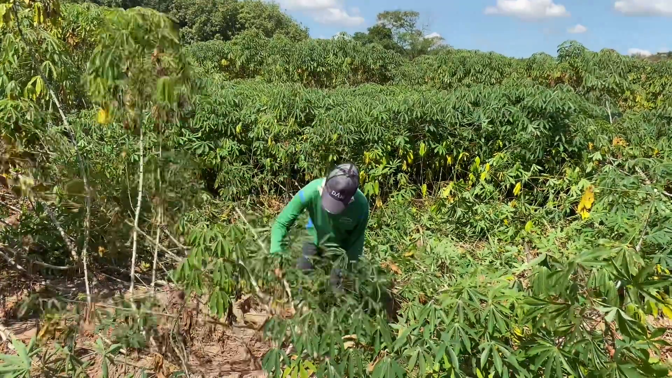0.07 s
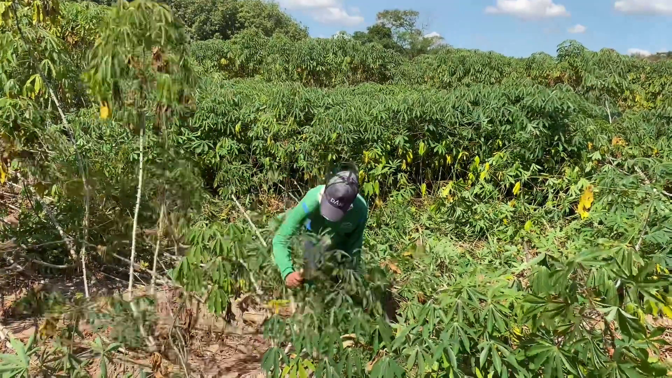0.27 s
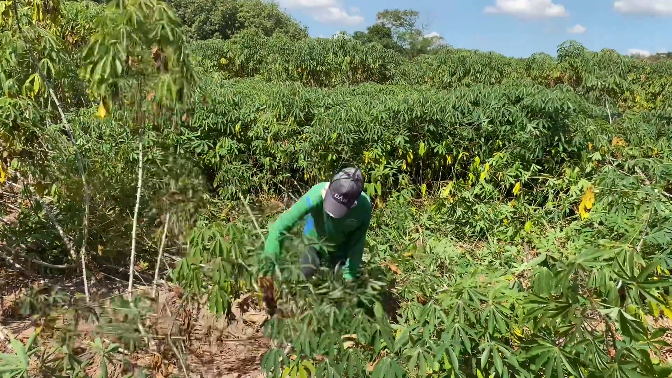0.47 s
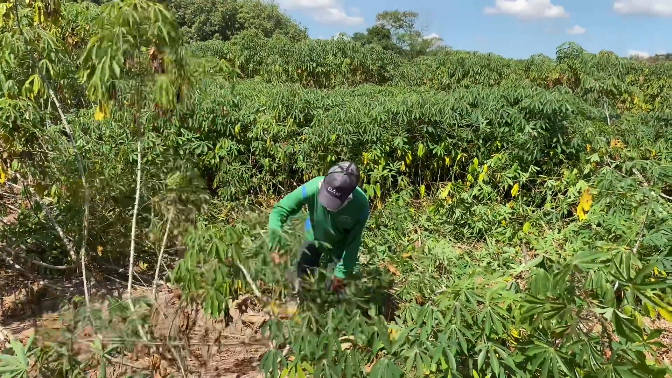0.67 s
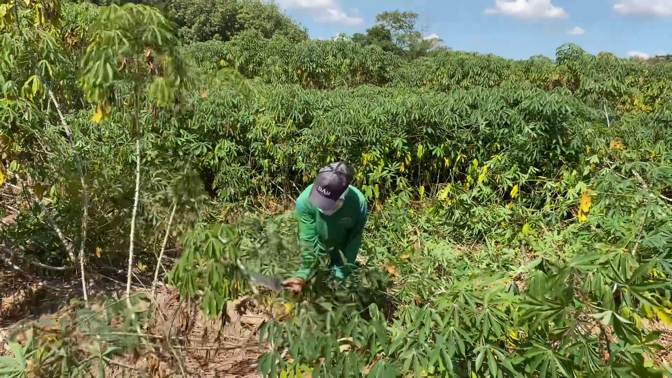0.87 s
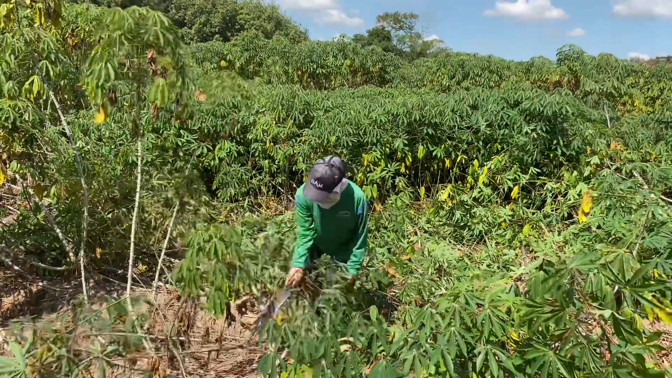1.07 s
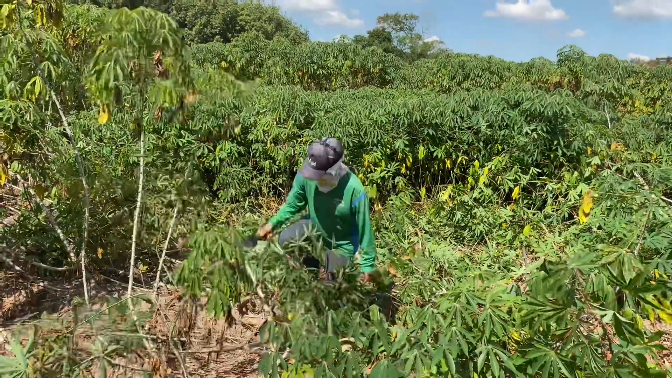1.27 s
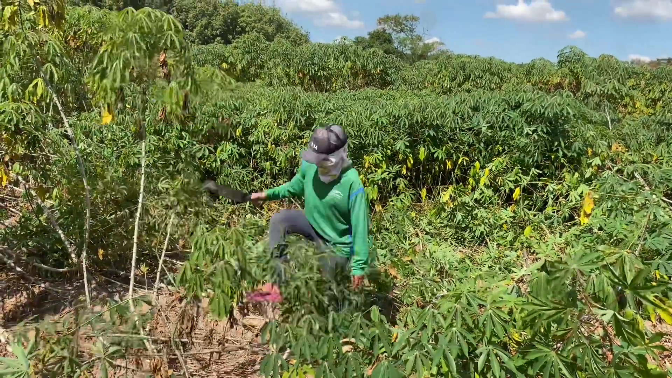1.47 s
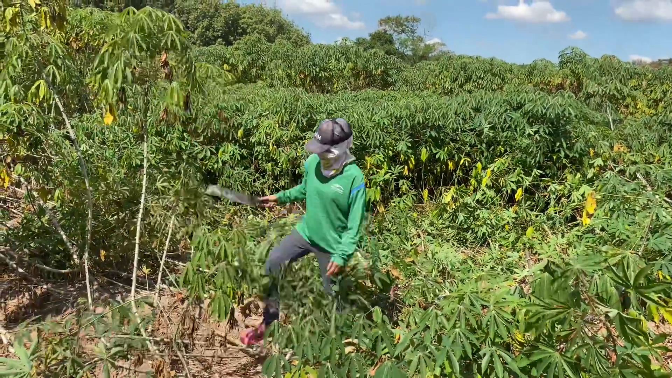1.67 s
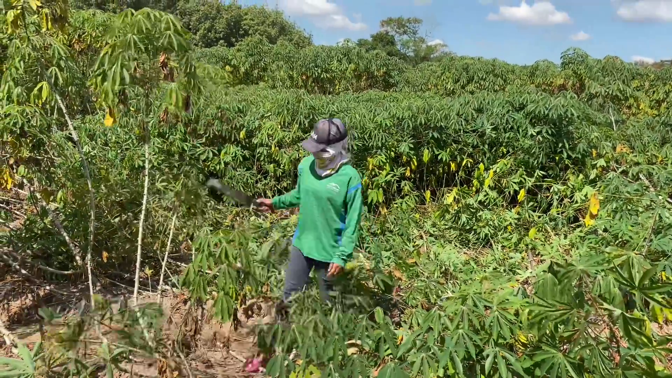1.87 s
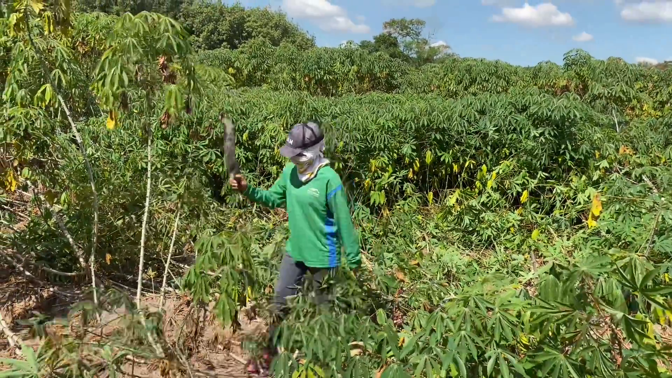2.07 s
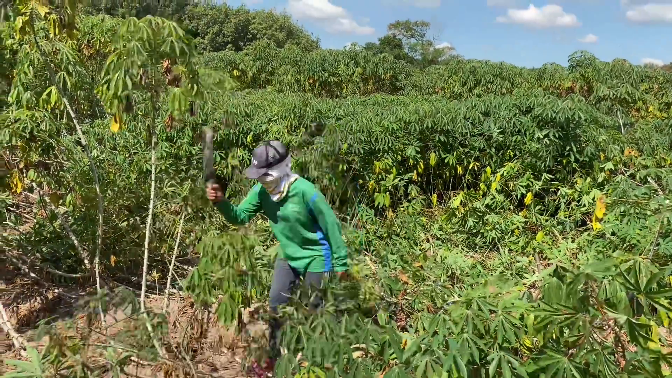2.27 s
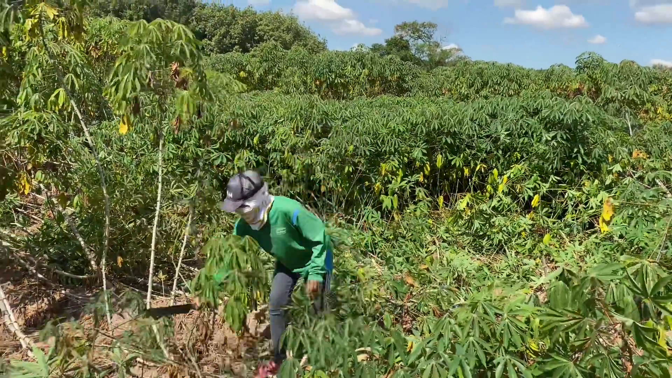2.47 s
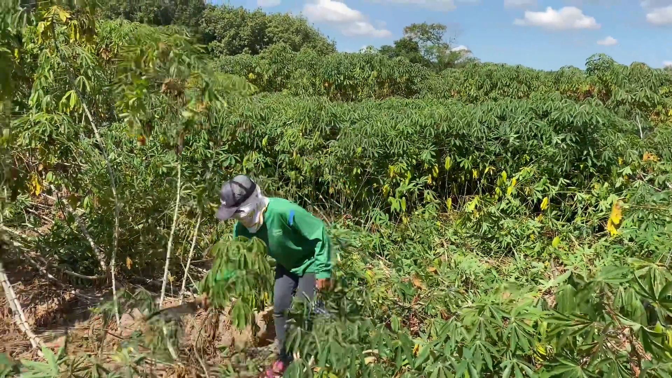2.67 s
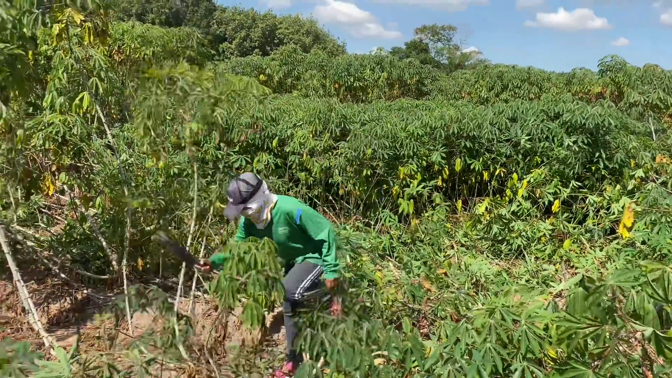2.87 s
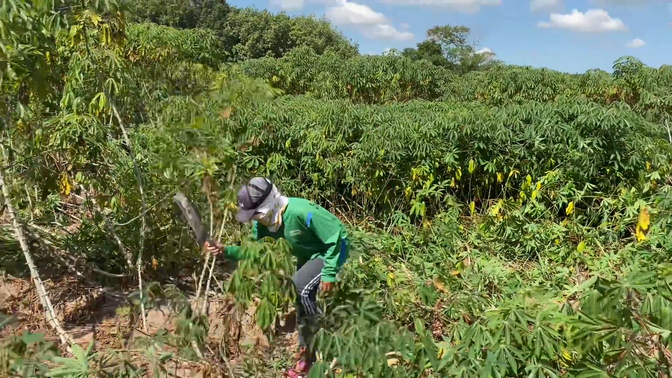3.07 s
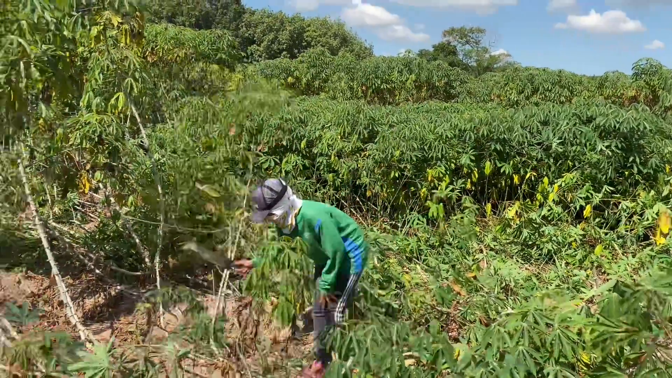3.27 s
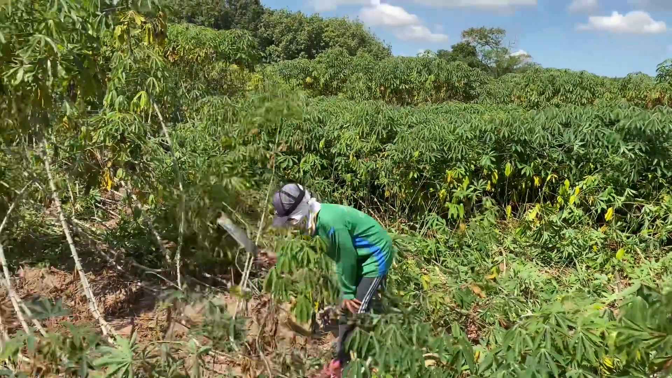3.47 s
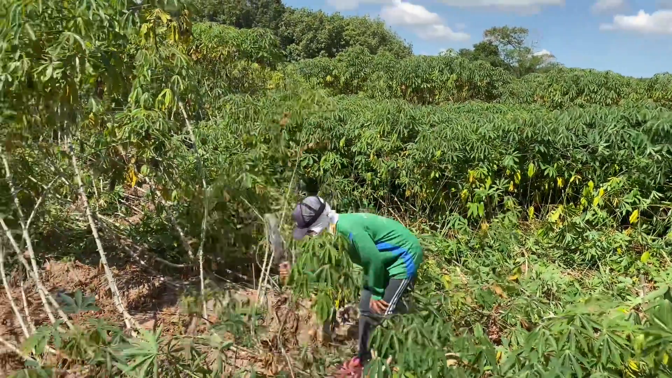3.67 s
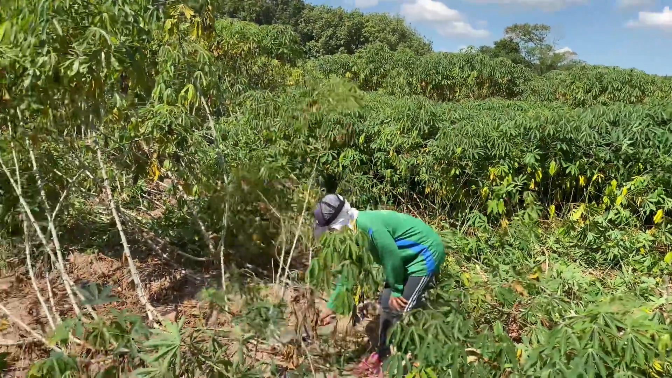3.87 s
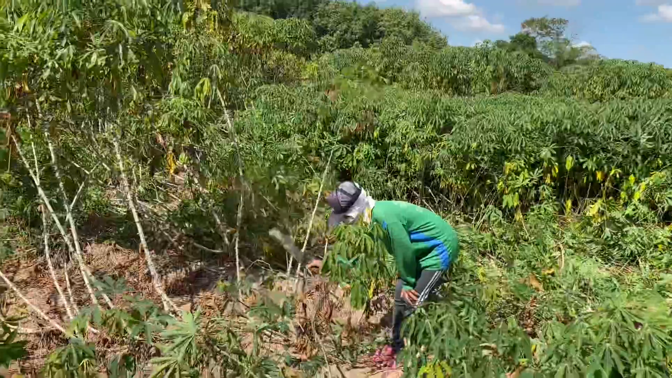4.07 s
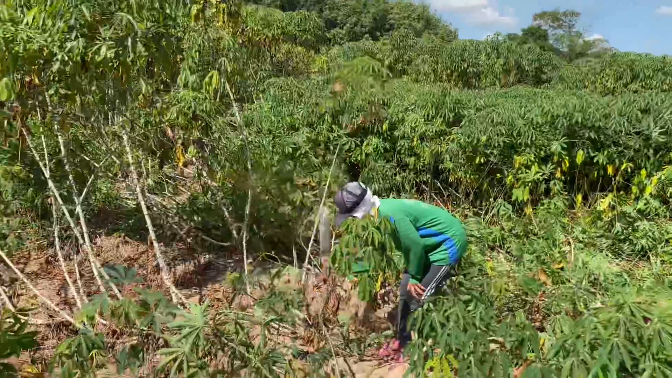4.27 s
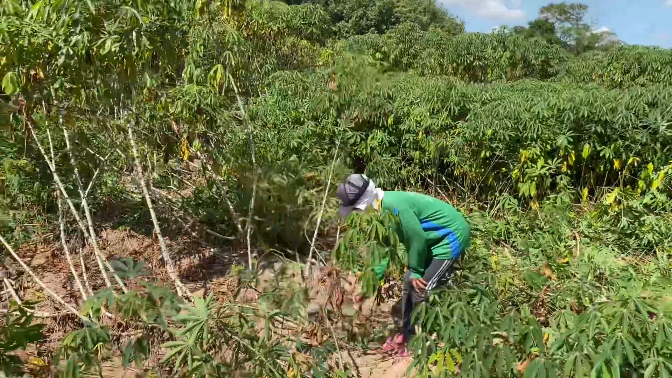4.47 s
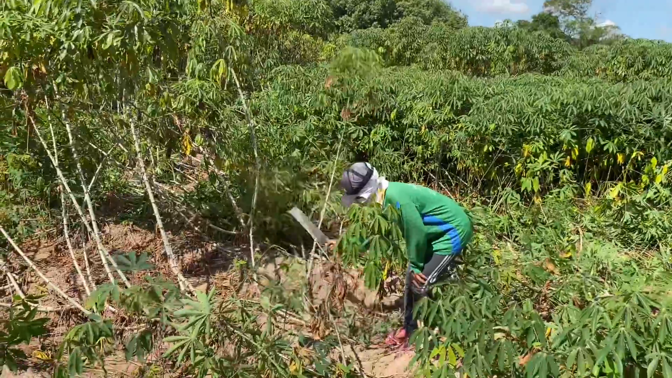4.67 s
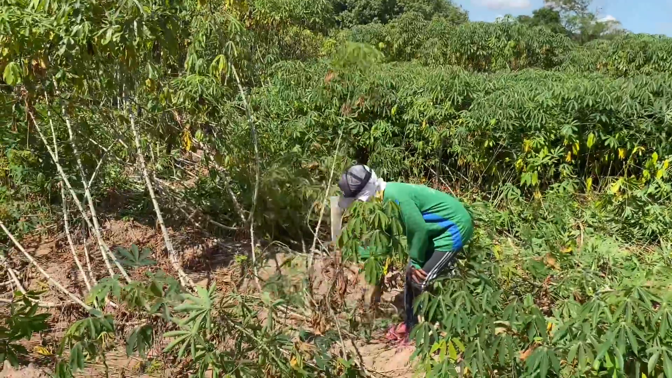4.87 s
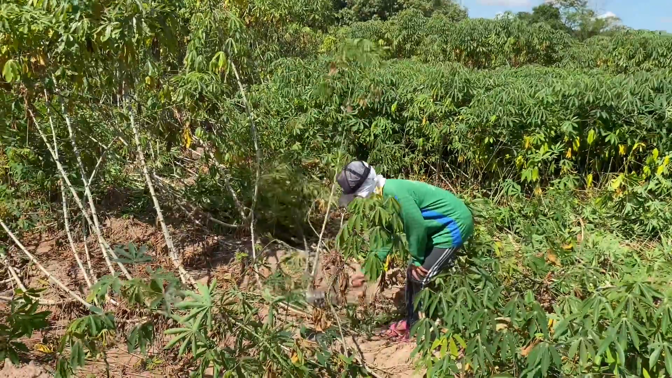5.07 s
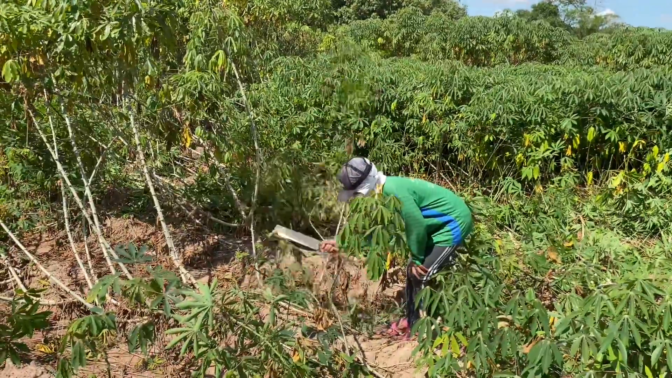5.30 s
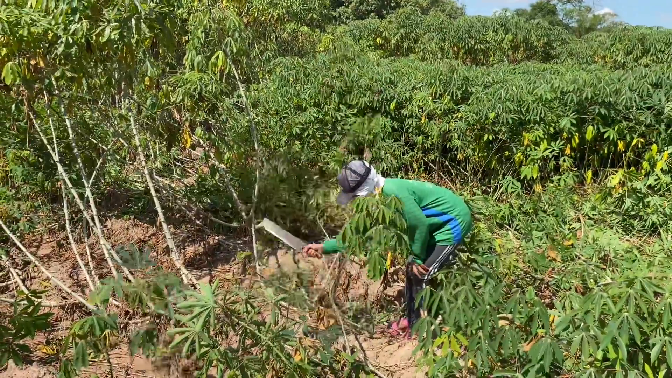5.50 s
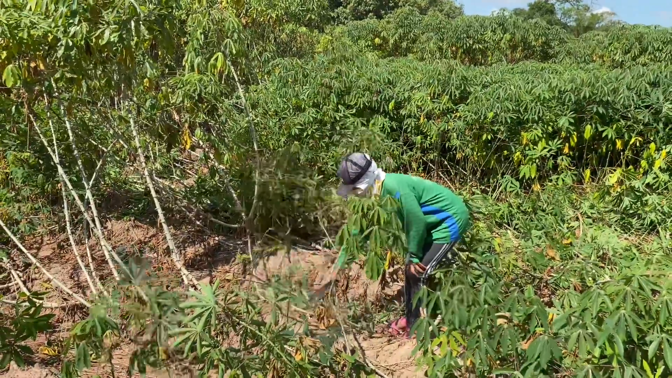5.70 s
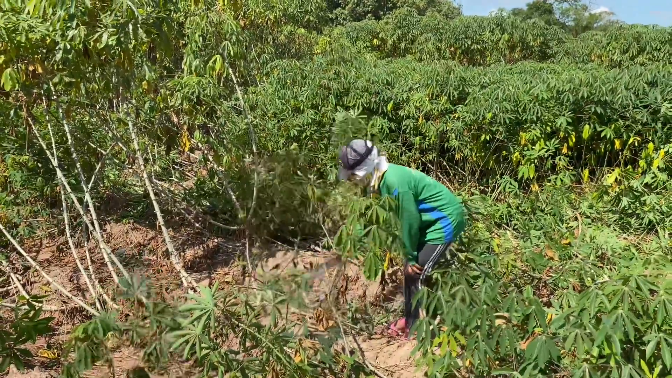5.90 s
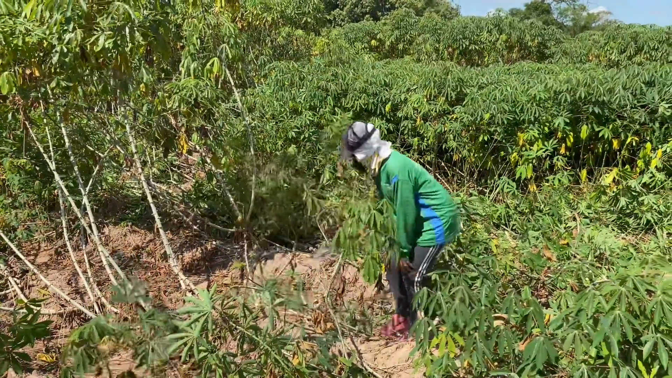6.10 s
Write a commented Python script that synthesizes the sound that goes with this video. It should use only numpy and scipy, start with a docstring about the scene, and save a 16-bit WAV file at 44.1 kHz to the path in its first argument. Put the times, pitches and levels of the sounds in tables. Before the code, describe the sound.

In an open field, heard in stereo from a few metres away, a machete works through woody stalks over a quiet airy hush, light wind and a barely audible far drone. A crisp, crunchy cut at 0.3 s rings the steel, with a soil thud; a shorter one follows at 0.85 s, and stems faintly graze the blade. Leaves rustle, and a strong dry stalk crack at 1.5 s leads into a twig snap and foot scuff until 1.8 s. A softer, slower-edged cut lands at 2.4 s with a thud. Loose stalks knock at 3.1 s. Bright chops with woody knocks and damped clanks come at 3.7, 4.3 and 4.9 s; a stalk knocks at 5.3 s. A weak double cut at 5.55 and 5.65 s ends in dull thuds, strongest near 5.95 s, as wind rises slightly. Faint falling bird whistles pass near 1, 4.2 and 4.7 s.

```python
"""An open field, a few metres away: a machete cuts woody cassava stalks.
Each cut is a burst of tiny pulses, the breaking fibres, with a stalk and steel ring, a thump and shaking leaves.
Between cuts loose stalks knock, twigs snap, stems graze the blade, soil thuds and a foot scuffs.
Rustling leaves are clumped crackle; light wind, open air and a far drone are filtered crackle.
Far birds are faint falling whistles."""
import sys
import numpy as np
from scipy.fft import rfft, irfft, next_fast_len
from scipy.io import wavfile
from scipy.ndimage import map_coordinates

SR = 44100
rng = np.random.default_rng(int(sys.argv[2]) if len(sys.argv) > 2 else 0)


def file_out(sig):
    """Save sig as 16-bit WAV at sys.argv[1]."""
    # one column per channel
    cols = np.atleast_2d(sig).T
    # limit, then scale
    lim = np.clip(cols, -1, 1)
    pcm = np.round(lim * 32767).astype(np.int16)
    wavfile.write(sys.argv[1], SR, pcm)


N = 270729
T = np.arange(SR // 2) / SR  # seconds within one event


def amp(db):
    """Turn decibels into gain."""
    return 10 ** (np.asarray(db) / 20)


def unit(x):
    """Scale to rms 1."""
    return x / np.sqrt(np.mean(x ** 2) + 1e-20)


def along(points, hz):
    """Read a curve of (frequency, value) points on a log frequency axis."""
    f, v = np.transpose(points)
    return np.interp(np.log(hz + 1), np.log(f + 1), v)


def swell(rows):
    """Gain for every sample from (time_s, level_db) rows."""
    return amp(np.interp(np.arange(N) / SR, *np.transpose(rows)))


def wobble(rate):
    """A smooth random curve with this many random points a second."""
    knots = rng.standard_normal(int(N * rate / SR) + 4)
    return map_coordinates(knots, [np.arange(N) * rate / SR])


def filtered(x, response):
    """Pass x through a response, which may be complex, given as a function of frequency."""
    n = x.shape[-1]
    m = next_fast_len(n + SR // 4)  # spare room for the tail
    spectrum = rfft(x, m) * response(np.fft.rfftfreq(m, 1 / SR))
    return irfft(spectrum, m)[..., :n]


def colour(points, tilt_db=0):
    """Response of a spectrum, tilted by so many dB per octave about 2 kHz, flat tilt below 500 Hz."""
    return lambda f: amp(along(points, f) + tilt_db * np.log2(np.maximum(f, 500) / 2000))


def resonances(modes):
    """Response of an object that rings at (pitch_hz, width_hz, level_db) modes."""
    def response(f):
        total = 0
        for k, (hz, width, db) in enumerate(modes):
            peak = 1j * f * width / (hz * hz - f * f + 1j * f * width)
            total = total + (-1) ** k * amp(db) * peak  # signs alternate from mode to mode
        return total
    return response


def crackle(n, response, width, spiky_db=0):
    """Stereo stream of tiny pulses of uneven size through a response, rms 1."""
    size_db = spiky_db * np.minimum(rng.standard_normal(n), 2.8)
    pulses = rng.standard_normal((2, n)) * amp(size_db)

    def mid_and_side(f):
        return response(f) * np.array([np.ones_like(f), amp(along(width, f))])

    mid, side = filtered(pulses, mid_and_side)
    return unit(np.array([mid + side, mid - side]))


# How wide nearby sounds are: frequency_hz, side_minus_mid_db
NEAR_WIDTH = [(100, -43), (700, -20), (2400, -9.5), (5000, -5), (7000, -22)]


def burst(response, hold, t60, attack=0.00062, spiky_db=0, width=NEAR_WIDTH):
    """A burst of pulses that rises, holds, then dies by 60 dB in t60 seconds; its level follows that shape."""
    shape = (1 - np.exp(-T / attack)) * amp(-60 * np.maximum(T - hold, 0) / t60)
    return unit(crackle(len(T), response, width, spiky_db) * shape) * np.sqrt(np.mean(shape ** 2))


def ringing(modes, attack):
    """Damped sines from (pitch_hz, level_db, t60_s) modes, each at a new strength and phase."""
    chance = rng.standard_normal((len(modes), 2))
    ring = 0
    for (hz, db, t60), (size_db, phase) in zip(modes, chance):
        ring = ring + amp(db + size_db - 60 * T / t60) * np.sin(2 * np.pi * (hz * T + phase))
    return ring * (1 - np.exp(-T / attack))


def add(track, s, sound):
    """Mix a sound into the track at time s."""
    part = track[:, max(round(s * SR), 0):][:, :len(T)]
    part += sound[..., :part.shape[1]]


# Wind strength, before the overall lift in field(): time_s, level_db
WIND_LEVEL = [(0.0, -56), (2.27, -58.5), (2.49, -55.5), (3.28, -59), (5.56, -54.5), (5.86, -48.5),
              (6.14, -46)]
# Tone of the wind, then of the open air: frequency_hz, level_db_per_hz
WIND_TONE = [(12, -25), (26, -7), (45, 1), (75, 3.5), (115, -1), (180, -18), (300, -19), (700, -62)]
AIR_TONE = [(60, -29), (150, 0), (400, -6), (1000, -6), (2000, -8), (4000, -14.5), (8000, -10.5),
            (16000, -16.5)]
# The far drone's notes: pitch_hz, width_hz, level_db
DRONE_MODES = [(847, 11, 2.5), (1757, 57, -7)]
# How wide surrounding sounds are: frequency_hz, side_minus_mid_db
WIDE_WIDTH = [(60, -15.5), (300, -5), (1200, -3.5), (3000, -3.5), (5200, -3), (7000, -9.5)]


def field():
    """Light wind rumbles unevenly over the open air's steady hush and a wavering far drone."""
    gusts = amp(2.5) * swell(WIND_LEVEL) * amp(0.85 * wobble(14.0))
    wind = gusts * crackle(N, colour(WIND_TONE), WIDE_WIDTH)
    air = amp(-53) * crackle(N, colour(AIR_TONE), WIDE_WIDTH)
    drone = amp(-64 + 0.37 * wobble(4.08)) * crackle(N, resonances(DRONE_MODES), WIDE_WIDTH)
    return wind + air + drone


# The body pushes through the leaves: start_s, level_db (before the lift in foliage())
BRUSHES = [(-.14, -55.5), (.09, -51), (1.17, -57), (1.54, -50), (2.0, -58), (2.72, -54), (2.99, -49.5),
           (3.94, -56), (4.14, -55.5), (5.15, -50.5)]
SWAY_RISE_S, SWAY_FALL_DB_PER_S = 0.14, 37  # disturbed leaves swing up, then settle
STILL_LEAVES_DB = -66  # rustle of undisturbed leaves, before the same lift


def sway():
    """Gain of the rustle: every stroke and every brush sets leaves swinging, and they slowly settle."""
    t, power = np.arange(N) / SR, amp(STILL_LEAVES_DB) ** 2
    for s, *_, db in CUTS + BRUSHES:
        rise = np.clip((t - s) / SWAY_RISE_S, 0, 1)
        settling_db = db - SWAY_FALL_DB_PER_S * np.maximum(t - s - SWAY_RISE_S, 0)
        power = power + (rise * amp(settling_db)) ** 2
    return np.sqrt(power)


# Tone of leaves and twigs: frequency_hz, level_db_per_hz
LEAF_TONE = [(100, -24), (300, -3), (800, 0), (1800, -1.5), (4000, 0.5), (7500, 2.5), (11000, 1),
             (16000, -1.5)]


def foliage():
    """Swaying leaves brush each other in clumps of fine crackles."""
    clumps = unit(amp(1.4 * wobble(35) + 1.5 * wobble(300)))  # slow and fast clumping
    return amp(6.0) * sway() * clumps * crackle(N, colour(LEAF_TONE), WIDE_WIDTH, spiky_db=3.0)


TICKS_PER_S, TICK_DB, TICK_SPREAD_DB = 3.4, -46.5, 3


def ticks():
    """Small dry stems give way at random moments, each a short spiky burst."""
    out = np.zeros((2, N))
    for _ in range(round(TICKS_PER_S * N / SR)):
        s, db = rng.uniform(0, N / SR), rng.normal(TICK_DB, TICK_SPREAD_DB)
        add(out, s, amp(db) * burst(colour(LEAF_TONE), 0, t60=0.075, attack=0.00013, spiky_db=10))
    return out


# The clearest twigs and leaf stems snapping: start_s, level_db, t60_s
SNAPS = [(0.088, -35, 0.027), (0.255, -33.5, 0.22), (.491, -36, 0.14), (0.832, -32, 0.061),
         (1.089, -40.5, .016), (1.571, -29.5, .11), (2.051, -34, .021), (2.876, -38.5, 0.049),
         (3.352, -36.5, 0.054), (4.871, -36.5, .03), (5.474, -39, 0.1), (5.543, -31.5, 0.075)]


def snaps():
    """A twig or leaf stem breaks at once: a very spiky burst with a sudden start."""
    out = np.zeros((2, N))
    for s, db, t60 in SNAPS:
        snap = burst(colour(LEAF_TONE, tilt_db=0.5), 0, t60, attack=0.0001, spiky_db=7.5)
        add(out, s, amp(db) * snap)
    return out


# The blade's ringing notes when free: pitch_hz, level_db, t60_s
BLADE = [(1210, -11, 0.44), (2034, -1.5, 0.27), (2084, 2.5, 0.3), (2230, -1.5, 0.14), (2330, -7, 0.37),
         (2657, -1, 0.13), (3170, -9.5, 0.025), (3685, -6, 0.062), (5370, -9, 0.088), (5700, -7.5, 0.12),
         (6920, -66, 0.1)]


def steel(damping_hz):
    """The blade's response, its modes widened by whatever touches it."""
    modes = []
    for hz, db, t60 in BLADE:
        free_width = np.log(1000) / np.pi / t60  # a longer ring means a narrower mode
        modes.append((hz, free_width + damping_hz, db))
    return resonances(modes)


# Blade strokes: start_s, crunch_db, rise_s (time constant), bite_s, stalk_hz,
# stalk_db (before the touch and bending balance), blade_db, leaf_shake_db, leaf_sway_db (before the lift)
CUTS = [(0.2815, -20.5, 0.00092, 0.022, 1250, -27.5, -25, -35.5, -46),
        (0.8415, -24.5, .001, 0.011, 716, -28, -27, -42, -84),
        (2.413, -24.5, 0.0054, 0.025, 600, -36, -31, -32.5, -54),
        (3.717, -20.5, 0.0021, 0.01, 1135, -23.5, -22.5, -33.5, -54),
        (4.295, -24.5, .0011, 0.0095, 1016, -28.5, -24.5, -30.5, -56.5),
        (4.895, -25, 0.0011, 0.01, 1168, -21.5, -26.5, -34, -55),
        (5.552, -27, 0.0016, 0.0031, 346, -36, -53, -29, -53.5),
        (5.64, -33, 0.0027, 0.0037, 2980, -37.5, -41, -39.5, -57.5)]
# Tone of breaking fibres, then of a push into the ground: frequency_hz, level_db_per_hz
FIBRE_TONE = [(100, -48), (400, -6.5), (650, 2.5), (1000, -1), (1800, 0.5), (2900, 2.5), (4400, -2),
              (7000, 0), (11000, -4.5), (16000, -9)]
THUMP_TONE = [(30, -34), (70, 2), (130, 0), (300, -3), (600, -15.5), (1500, -18), (4000, -82)]
THUMP_DB = -34.5  # the jolt that every stroke sends into the ground
SECOND_DB = -1  # the stalk's second mode compared with its first
# a leafier plant crunches brighter: dB per octave for each dB of shake above the plain level
PLAIN_SHAKE_DB, TILT_DB_PER_DB = -37.5, 0.21


def cuts():
    """Fibres break for as long as the edge bites; they drive stalk and blade, and the jolt shakes the plant."""
    out = np.zeros((2, N))
    for s, db, rise, bite, stalk_hz, stalk_db, blade_db, shake_db, _ in CUTS:
        tilt_db = TILT_DB_PER_DB * (shake_db - PLAIN_SHAKE_DB)
        fibres = burst(colour(FIBRE_TONE, tilt_db), bite, t60=.05, attack=rise, spiky_db=5)
        shake = burst(colour(FIBRE_TONE, tilt_db + 0.5), bite, t60=0.4, attack=2 * rise, spiky_db=0.5)
        blade = burst(steel(damping_hz=80), bite, t60=0.077, attack=rise)
        # the first touch of the edge knocks the stalk; the breaking fibres keep it sounding
        touch = ringing([(stalk_hz, 0, .04), (1.62 * stalk_hz, SECOND_DB, .03)], attack=0.00053)
        bending = resonances([(stalk_hz, 0.12 * stalk_hz, 0), (1.73 * stalk_hz, 0.35 * stalk_hz, SECOND_DB)])
        stalk = amp(5.5) * touch + amp(-2.5) * burst(bending, bite, t60=0.051)
        thump = burst(colour(THUMP_TONE), bite, t60=0.22, attack=0.0043)
        add(out, s, amp(db) * fibres + amp(blade_db) * blade + amp(stalk_db) * stalk)
        add(out, s, amp(shake_db) * shake + amp(THUMP_DB) * thump)
    return out


# The blade comes free and clips a stem: start_s, level_db, damping_db_per_s (by hand and stems)
CLANKS = [(.295, -34.5, 2), (.872, -35, 260), (3.743, -29.5, 83), (4.302, -34, 120), (4.903, -30.5, 204),
          (5.569, -35, 120)]
CLANK_STEM_HZ, CLANK_WOOD_DB, CLANK_CRUNCH_DB = 1271, 0, 2  # the clipped stem; levels beside the ring


def clanks():
    """Once through the wood, the steel clips a neighbouring stem and rings while hand and stems damp it."""
    out = np.zeros((2, N))
    for s, db, damping in CLANKS:
        ring = amp(-damping * T) * ringing(BLADE, attack=0.0026)
        stem = ringing([(CLANK_STEM_HZ, 0, .04), (1.78 * CLANK_STEM_HZ, 3, .04)], attack=0.00017)
        crunch = burst(colour(FIBRE_TONE, tilt_db=3), hold=0.0027, t60=0.064, spiky_db=3)
        add(out, s, amp(db) * (ring + amp(CLANK_WOOD_DB) * stem + amp(CLANK_CRUNCH_DB) * crunch))
    return out


# Dull thuds on the soil: start_s, level_db, pitch_hz
THUDS = [(.31, -28, 168), (2.428, -26, 125), (5.661, -31.5, 186), (5.731, -30, 67), (5.932, -27.5, 137),
         (5.941, -20.5, 67)]


def thuds():
    """Soft soil gives one low note that dies at once."""
    out = np.zeros((2, N))
    for s, db, hz in THUDS:
        shape = (1 - np.exp(-T / 0.0028)) * amp(-60 * T / 0.11)
        add(out, s, amp(db) * np.sin(2 * np.pi * hz * T) * shape)
    return out


# The flat of the blade grazing stems: start_s, scrape_db, singing_db, length_s
GRAZES = [(0.393, -57, -50.5, 0.08), (0.74, -58, -51.5, 0.08), (0.945, -52, -55, 0.042),
          (2.551, -46, -66, 0.027)]


def grazes():
    """A soft stem scrapes the blade's low modes and keeps its strongest one singing while it slides."""
    out = np.zeros((2, N))
    hz, _, t60 = max(BLADE, key=lambda mode: mode[1])

    def soft(f):
        return steel(damping_hz=15)(f) / (1 + (f / 2800) ** 4)  # a soft stem barely excites the treble

    for s, scrape_db, sing_db, length in GRAZES:
        shape = (1 - np.exp(-T / 0.016)) * amp(-60 * np.maximum(T - length, 0) / t60)
        sing = np.sin(2 * np.pi * hz * T) * shape
        scrape = burst(soft, length, t60=0.25, attack=0.0033)
        add(out, s, amp(scrape_db) * scrape + amp(sing_db) * sing)
    return out


# Far birds: start_s, length_s, start_hz, end_hz, level_db (before the lift and the fade in and out)
BIRDS = [(.98, .26, 2000, 1600, -63), (1.247, 0.026, 1340, 1260, -55), (4.215, 0.1, 4170, 3450, -48.5),
         (4.66, .57, 1740, 1507, -59)]
BIRD_WAVER, BIRD_WARBLE, BIRD_FLUTTER_DB = .035, .02, 3  # fast and slow pitch wobble (fractions), level


def birds():
    """Faint falling whistles, their pitch blurred by distance."""
    out, t = np.zeros(N), np.arange(N) / SR
    for s, length, start_hz, end_hz, db in BIRDS:
        progress = np.clip((t - s) / length, 0, 1)
        blur = 1 + BIRD_WAVER * wobble(250) + BIRD_WARBLE * wobble(45)
        hz = (start_hz + (end_hz - start_hz) * progress) * blur
        level = amp(db + BIRD_FLUTTER_DB * wobble(35)) * np.sqrt(progress * (1 - progress) * 2)
        out += level * np.sin(2 * np.pi * np.cumsum(hz) / SR)
    return amp(5.5) * out


# Loose stalks striking each other and the soil:
# start_s, crack_db, wood_hz, wood_db, upper_mode_db (compared with the main mode), thump_db
KNOCKS = [(1.467, -14.5, 3100, -16, -7, -33), (1.514, -26, 1600, -54, -10, -49),
          (1.582, -30, 1100, -46, -10, -36.5), (2.101, -36, 915, -48, -10, -49),
          (2.409, -29, 1600, -30, -3, -50), (3.107, -26, 1980, -35, -15, -49.5),
          (3.148, -26, 682, -27, -5, -42), (3.806, -48, 610, -38, -1, -49), (4.536, -52, 647, -41, -7, -48),
          (5.271, -25, 1260, -25, -13, -34), (5.5169, -31, 3770, -37, -14, -57)]


def knocks():
    """A crack, a few heavily damped bending modes of the stalk, and a low push."""
    out = np.zeros((2, N))
    for s, crack_db, hz, wood_db, upper_db, thump_db in KNOCKS:
        modes = [(0.493 * hz, -6, .028), (hz, 0, .022), (1.4 * hz, upper_db, .018)]
        wood = ringing(modes, attack=0.000088)
        crack = burst(colour(FIBRE_TONE, tilt_db=0.5), 0, t60=0.021, attack=0.00021, spiky_db=2)
        thump = burst(colour(THUMP_TONE), 0, t60=0.13, attack=0.0011)
        add(out, s, amp(wood_db) * wood + amp(crack_db) * crack + amp(thump_db) * thump)
    return out


# A foot dragging on soil: time_s, level_db
SCUFF_LEVEL = [(1.56, -75), (1.59, -43), (1.63, -45.5), (1.70, -39.5), (1.75, -42), (1.82, -75)]
# Tone of the dry soil: frequency_hz, level_db_per_hz
SOIL_TONE = [(80, -8), (250, -3.5), (800, -6.5), (1600, -14.5), (5000, -10.5), (16000, -10.5)]


def scuff():
    """A foot drags over dry soil: a swelling stream of very uneven grains."""
    return swell(SCUFF_LEVEL) * crackle(N, colour(SOIL_TONE), NEAR_WIDTH, spiky_db=8.5)


def scene():
    """The work in front of the open field."""
    background = field() + foliage() + ticks() + birds()
    blade_work = cuts() + clanks() + grazes()
    small_contacts = snaps() + thuds() + knocks() + scuff()
    return background + blade_work + small_contacts


# The two microphone ports' loudness: frequency_hz, left_minus_right_db
PORT_LEVEL = [(100, 1.4), (2000, 0.5), (3600, 2.5), (5200, 4), (6300, 0.5), (8500, 1)]
# The two microphone ports' timing: frequency_hz, left_lead_radians
PORT_LEAD = [(100, 0.12), (1800, 0.36), (3200, 0.35), (4500, 0), (5600, 1), (7000, 0)]
WIDEN_HZ, TURN_HZ = 7000, 4100  # where widening starts; how far up for each full turn of phase
TOP_HZ = 15850  # steep upper limit of the sound


def record(dry):
    """Two unequal ports; the recorder widens the treble by turning one signal's phase between the channels."""
    sides = np.array([[1], [-1]])
    mid, side = (dry[0] + dry[1]) / 2, (dry[0] - dry[1]) / 2
    # above WIDEN_HZ only the middle signal is left
    pair = mid + sides * filtered(side, lambda f: 1 / (1 + (f / WIDEN_HZ) ** 16))

    def ports(f):
        turn = 2 * np.pi * np.maximum(f - WIDEN_HZ, 0) / TURN_HZ
        turn = turn - np.sin(2 * turn) / 2  # the phase lingers where the channels agree or oppose
        level = amp(sides * along(PORT_LEVEL, f) / 2)
        return level * np.exp(1j * sides * (along(PORT_LEAD, f) - turn) / 2)

    return filtered(filtered(pair, ports), lambda f: 1 / np.sqrt(1 + (f / TOP_HZ) ** 300))


dry = scene()
out = record(dry)
file_out(out)
```